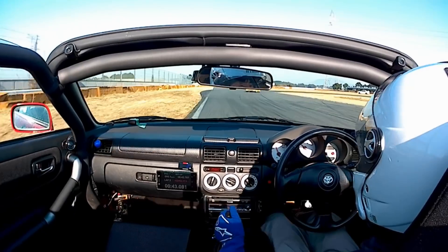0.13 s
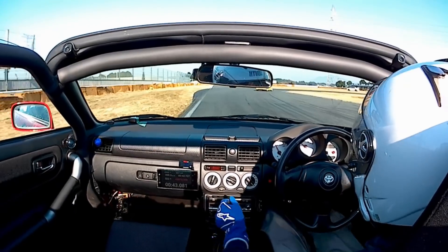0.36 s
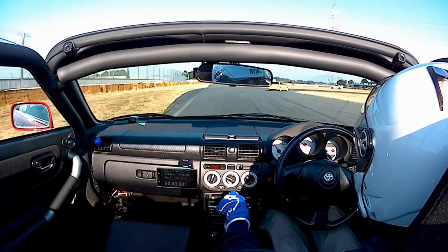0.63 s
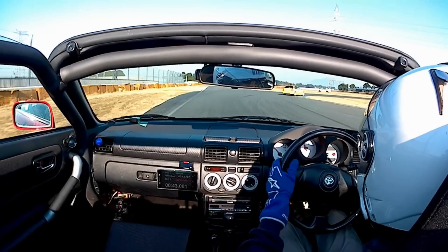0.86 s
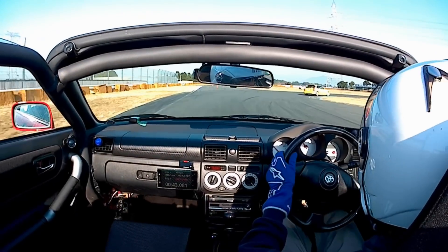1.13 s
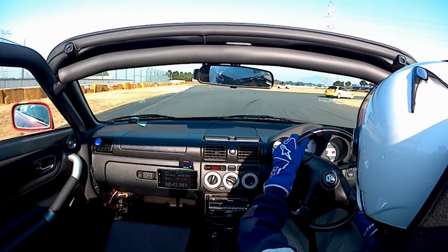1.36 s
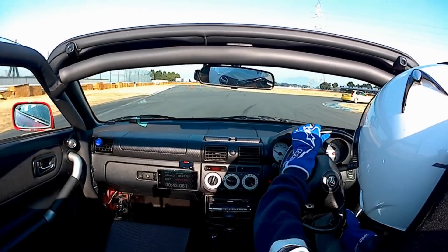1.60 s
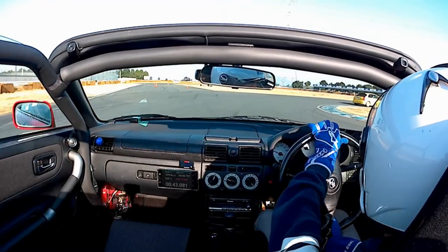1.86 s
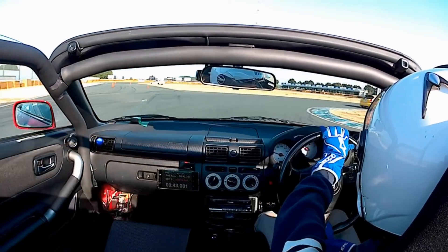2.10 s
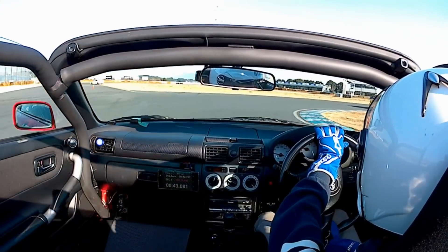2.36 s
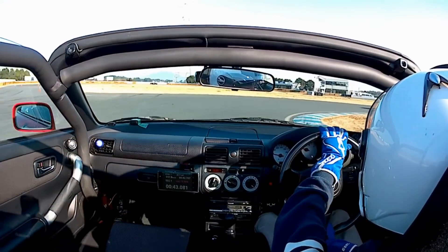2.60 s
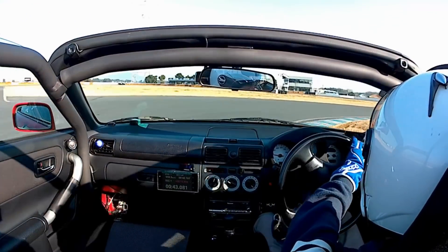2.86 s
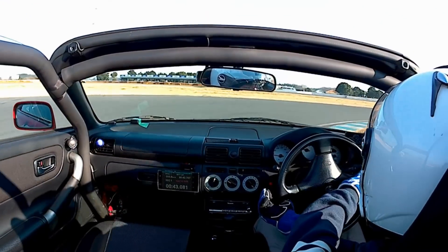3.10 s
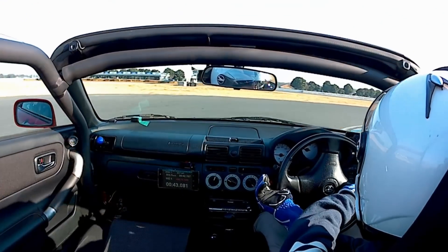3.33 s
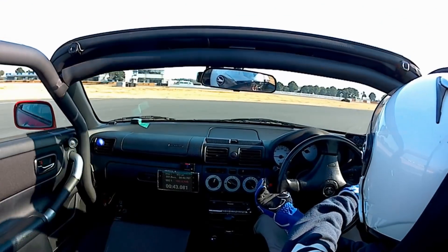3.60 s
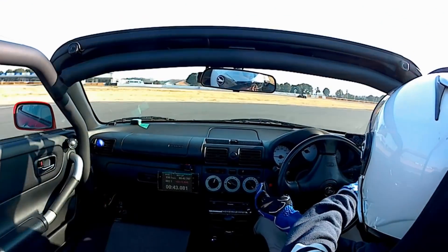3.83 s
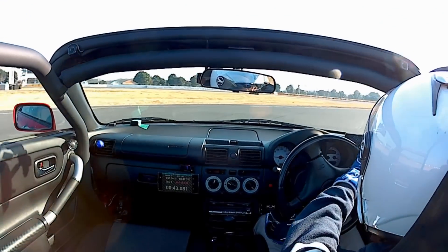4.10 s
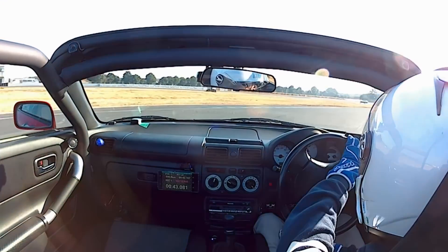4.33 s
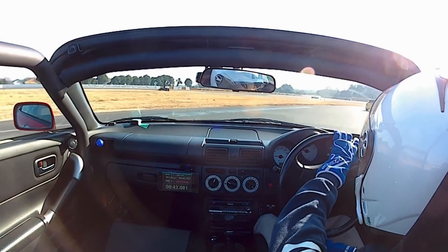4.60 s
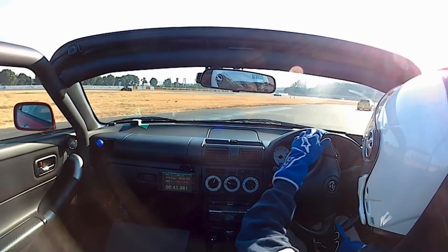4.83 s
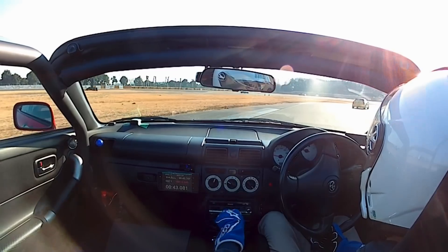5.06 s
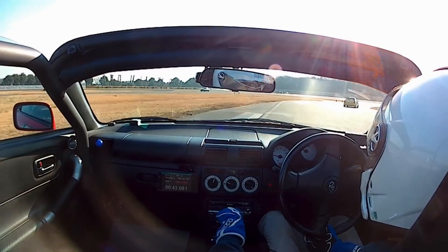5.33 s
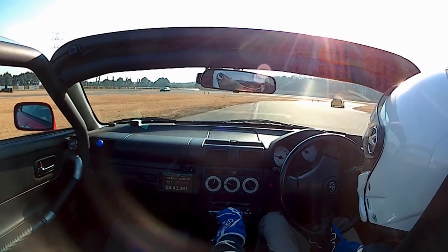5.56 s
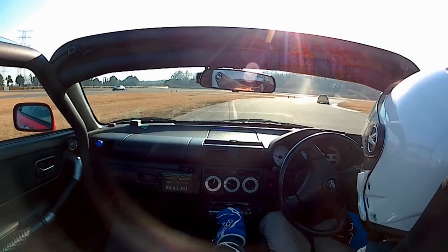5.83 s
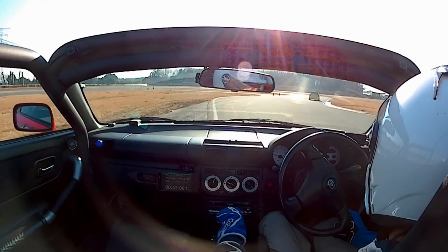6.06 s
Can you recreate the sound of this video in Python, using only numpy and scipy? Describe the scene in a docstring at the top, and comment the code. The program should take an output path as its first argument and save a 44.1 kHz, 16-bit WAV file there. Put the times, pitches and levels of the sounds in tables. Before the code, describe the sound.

In an open car on a race track, heavy low wind buffeting and road roar run throughout. Gear clunks and trim knocks surround a quick engine blip; the low drone then sinks through a bend and slowly climbs. Faint exhaust notes of two cars ahead appear, the first falling then rising. The microphone rides in the cockpit inside a closed case, so everything is boomy and muffled with grainy, resonant hiss.

```python
"""An engine blips for a downshift, slows into a bend and pulls away, in wind and road roar, with rattling trim.
Of two cars ahead, one slows then accelerates, the other accelerates, with faint exhaust notes. It is heard
in an open car, through a closed camera case. Engine and exhausts are wavering sines on multiples of a firing
rate; wind, roar, rush, growl and clunks are shaped noise; knocks and rattles ring the trim and the case.
An input stage rounds off large swings; the faint treble flickers, as bins drop out at random from frame to frame."""
import sys
import numpy as np
from scipy import signal
from scipy.io import wavfile
from scipy.ndimage import uniform_filter1d

SR = 44100
rng = np.random.default_rng(int(sys.argv[2]) if len(sys.argv) > 2 else 0)


def to_wav(s):
    """Save 16-bit WAV."""
    ch = np.atleast_2d(s).T  # columns
    pcm = np.round(np.clip(ch, -1, 1) * 32767)  # PCM
    wavfile.write(sys.argv[1], SR, pcm.astype(np.int16))


def invert_db(x):
    """Field ratio 10**(x/20) for x, a level in decibels (scalar or array-like)."""
    u = np.asarray(x, float) / 20
    return 10 ** u


N = 272979  # samples

# exhaust of the first car ahead: t/s, firing rate f/Hz, level/dB ahead of the order levels and far colour
FIRST_CAR_CURVE = [(1.4, 207, -64), (1.6, 197, -47.5), (1.9, 176, -52.5), (2.2, 149.2, -48.5),
                   (3.1, 167.1, -47.5), (3.45, 175.9, -42.5), (3.8, 185.1, -39), (4.3, 196.9, -38),
                   (4.85, 215.8, -40.5), (5.15, 226, -52), (5.75, 241.7, -52.5)]
# air resonances of the case: f/Hz, width/Hz, level/dB over a flat line
CASE_MODES = [(560, 21, -2.5), (1457, 190, 8), (1395, 500, 0), (3125, 632, 16.5), (4808, 460, 15),
              (6030, 130, 13.5), (6543, 483, 30), (9494, 570, 31), (15800, 230, 21)]
# air flow, mean levels: t/s, buffeting/dB, roar/dB, rush/dB, treble tilt of the rush/dB (full from 3 kHz up)
FLOW_CURVE = [(0.0, -17, -22.5, -35.5, -3), (0.33, -15.5, -32, -41, -4), (0.62, -17, -25.5, -37, 2),
              (0.8, -18.5, -30.5, -40, -1.5), (1.2, -21, -28, -39.5, 1.5), (2.0, -19, -32, -42.5, 1.5),
              (2.9, -22, -33.5, -44, 2), (3.5, -20.5, -30.5, -41, 0), (4.8, -22, -29, -41.5, 0),
              (5.35, -19.5, -33, -38.5, 1.5), (5.6, -21, -27, -37.5, 0), (6.19, -16.5, -30, -39.5, -2)]
GUST_CORNER_HZ = 9


def evened(x):
    """Scales to rms 1."""
    return x / np.sqrt(np.mean(x ** 2) + 1e-20)


def read(points, hz):
    """Reads a spectrum on a log-frequency axis."""
    f, value = np.transpose(points)
    return np.interp(np.log(hz + 1), np.log(f + 1), value)


def columns(rows, t):
    """Every column of a curve table at the times t."""
    s, *rest = np.transpose(rows)
    return [np.interp(t, s, c) for c in rest]


def drift(corner_hz):
    """Random wander of rms 1: one-pole low-passed noise."""
    knots_per_s = 60
    knots = rng.standard_normal(int(N / SR * knots_per_s) + 2)
    pole = np.exp(-2 * np.pi * corner_hz / knots_per_s)
    smooth = signal.lfilter([1], [1, -pole], knots)
    return evened(np.interp(np.arange(N) * knots_per_s / SR, np.arange(len(knots)), smooth))


def noise(shape_db, size, patchy_db, flicker_db):
    """Noise of rms 1 from random short-time spectra, with drifting patches and a flicker shared by all bins."""
    hop = size // 4
    frames, hz = N // hop + 5, np.fft.rfftfreq(size, 1 / SR)
    frame_s = np.arange(frames) * hop / SR
    a, b, patches = rng.standard_normal((frames, len(hz), 3)).T
    patches = uniform_filter1d(patches, size=6, axis=0)
    patches = evened(uniform_filter1d(patches, size=8, axis=1))
    flicker = evened(uniform_filter1d(rng.standard_normal(frames), size=3))
    level_db = shape_db(hz[:, None], frame_s) + patchy_db * patches + flicker_db * flicker
    z = (a + 1j * b) * invert_db(level_db)
    return evened(signal.istft(z, nperseg=size, noverlap=size - hop)[1][:N])


def orders(hz, multiples, levels_db, waver_db, corner_hz):
    """Sines on multiples of a firing rate, each wavering in strength."""
    turns = np.cumsum(hz) / SR
    out = 0
    for k, db in zip(multiples, levels_db):
        strength = np.sqrt(2) * invert_db(db + waver_db * drift(corner_hz))
        out = out + strength * np.sin(2 * np.pi * (k * turns + rng.random()))
    return out


def humps_db(modes, hz):
    """Gain of a row of resonances over a flat line."""
    return 20 * np.log10(1 + sum(invert_db(db) / (1 + (2 * (hz - f) / w) ** 2) for f, w, db in modes))


def engine(t):
    """Firing boom; upper orders open with the throttle and swell where they cross a cabin resonance."""
    # own engine: t/s, firing rate f/Hz, boom level/dB, throttle gain of the upper orders/dB
    engine_curve = [(0.0, 129, -25, -16), (0.12, 127.9, -22.5, -9), (0.17, 127, -26.5, -2),
                    (0.25, 125, -37, -18), (0.43, 129, -38, -17), (0.52, 131.7, -16.5, -1.5),
                    (0.548, 131.3, -26, -15), (0.57, 134, -26.5, -3.5), (0.654, 172, -27.5, -15),
                    (0.718, 177.3, -21.5, -4), (0.774, 161, -29.5, -15), (0.852, 135.2, -20, -9.5),
                    (1.0, 138, -21.5, -11.5), (1.284, 128.1, -19, -14.5), (1.45, 122, -32, -8),
                    (1.7, 112.4, -30, -16.5), (2.17, 101.5, -32.5, -14), (2.55, 98.02, -35.5, -8),
                    (3.0, 94, -28, -8.5), (3.35, 94.5, -34, -11), (3.55, 93.5, -28, -2.5),
                    (4.21, 97.3, -21.5, -0.5), (4.6, 99.6, -21.5, -4.5), (5.06, 105.6, -22, 0),
                    (5.45, 110.8, -30, -7.5), (6.19, 120.2, -26.5, 2.5)]
    # upper orders: multiple of the firing rate, level/dB ahead of throttle and cabin
    upper_orders = [(2, -42), (3, -49), (3.5, -51), (4, -57), (5, -59)]
    # cabin resonances passed by the upper orders: f/Hz, width/Hz, level/dB over a flat line
    cabin_modes = [(270, 19, -2), (394, 25, 3.5), (568.5, 49, 15)]
    hz, boom_db, throttle_db = columns(engine_curve, t)
    # below -23.5 dB the boom wavers more, the fainter it is
    waver_db = 0.39 + 0.21 * np.clip(-23.5 - boom_db, 0, 12)
    boom = orders(hz, [1], [boom_db], waver_db, corner_hz=11)
    multiples = [k for k, _ in upper_orders]
    upper_db = [db + throttle_db + humps_db(cabin_modes, k * hz) for k, db in upper_orders]
    return boom + orders(hz, multiples, upper_db, waver_db=4, corner_hz=11)


def jolt_db(t):
    """Jolts through the body change the noise level within a few milliseconds, then die away."""
    # jolts that shake the case: t/s, change of the rush/dB (one is a dip), decay/s
    jolts = [(0.053, 3, 0.023), (0.457, 3, 0.012), (0.514, 1, 0.033), (.575, -3.5, 0.043),
             (0.739, 2.5, 0.063), (1.501, 2, 0.012), (1.71, 1.5, 0.031), (5.01, 2.5, 0.025),
             (5.92, 2.5, .03), (6.075, 2.5, 0.031), (6.17, 4, 0.034)]
    rise_s = 0.0094  # ends at the listed time
    return sum(db * np.exp(-np.maximum(t - s, 0) / decay_s) * np.clip((t - s) / rise_s + 1, 0, 1)
               for s, db, decay_s in jolts)


def wind(t):
    """Lumpy pressure swings on the microphone, and the roar of road and body above them."""
    # buffeting spectrum: f/Hz, relative density/dB per Hz
    buffet_shape = [(2, -20), (7, -4), (15, 0), (24, -8), (38, -10), (58, -11), (75, -19), (110, -32),
                    (300, -130)]
    # roar spectrum: f/Hz, relative density/dB per Hz
    roar_shape = [(20, -61), (50, -23.5), (80, 2), (110, 4), (150, -4.5), (240, -3.5), (330, -12),
                  (480, -27.5), (700, -26), (2000, -120)]
    buffet = noise(lambda hz, s: read(buffet_shape, hz), size=8192, patchy_db=0.9, flicker_db=0)
    roar = noise(lambda hz, s: read(roar_shape, hz), size=1024, patchy_db=1.5, flicker_db=1.5)
    buffet_db, roar_db, *_ = columns(FLOW_CURVE, t)
    buffet_db = buffet_db + 2 * drift(GUST_CORNER_HZ)
    roar_db = roar_db + 1 * drift(GUST_CORNER_HZ) + 0.67 * jolt_db(t)
    return invert_db(buffet_db) * buffet + invert_db(roar_db) * roar


def case_db(hz):
    """Slope of the muffling case with its resonant humps."""
    # muffling slope: f/Hz, relative level/dB
    rush_slope = [(200, -19.5), (450, -4.5), (1000, -7.5), (2000, -15.5), (2500, -33.5), (4000, -41.5),
                  (5500, -44), (8000, -60), (16000, -52)]
    return read(rush_slope, hz) + humps_db(CASE_MODES, hz)


def ring(bright_db):
    """One tap rings the trim and the upper case resonances; each mode swells, then decays by its width."""
    trim_hz, trim_width_hz, trim_db = 1615, 390, 6.5  # level over the colour of the case
    t = np.arange(1300) / SR
    modes = [(f, w, bright_db if 2500 < f < 5500 else 0) for f, w, _ in CASE_MODES[1:]]
    modes.append((trim_hz, trim_width_hz, trim_db))
    out = 0
    for f, w, db in modes:
        envelope = w * t * np.exp(-np.pi * 0.9 * w * t)
        out = out + invert_db(case_db(f) + db) * envelope * np.sin(2 * np.pi * f * t)
    return out


def rush(t):
    """Air noise heard through the case, grainy with tiny rattles at random instants."""
    def bright(hz, s):
        tilt_db = columns(FLOW_CURVE, s)[-1] + 0.65 * jolt_db(s)
        return case_db(hz) + tilt_db * np.clip(hz / 1000 - 2, 0, 1)

    hiss = noise(bright, size=512, patchy_db=1.5, flicker_db=0.0)
    ticks_per_s = 300
    strength = invert_db(5.1 * np.minimum(rng.exponential(1, N), 4))
    ticks = strength * (rng.random(N) < ticks_per_s / SR) * rng.choice([-1, 1], N)
    rattle = evened(signal.oaconvolve(ticks, ring(0))[:N])
    return invert_db(columns(FLOW_CURVE, t)[-2] + jolt_db(t)) * (hiss + invert_db(-9) * rattle)


def knocks():
    """Knocks of loose trim: short bursts of impacts that swell, thin out and ring the trim and case."""
    # knocks: t/s, peak level/dB, gain of the 2.5-5.5 kHz modes/dB
    knock_rows = [(0.056, -23.5, 16), (0.5188, -23.5, 5), (0.5867, -31, 5), (0.7741, -27, 6),
                  (1.385, -26.5, 3), (1.5065, -31.5, 1), (1.7204, -35, 13), (3.442, -27.5, -3),
                  (5.8731, -17, -11), (5.8867, -25, -7), (6.0806, -27, 19)]
    swell_s = 0.0012
    out, age = np.zeros(N + 4000), np.arange(400) / (swell_s * SR)
    for s, db, bright_db in knock_rows:
        impacts = rng.standard_normal(400) * age * np.exp(-age)
        tap = np.convolve(impacts, ring(bright_db))
        out[round(s * SR):][:len(tap)] += invert_db(db) * tap / abs(tap).max()
    return out[:N]


def clunks(t):
    """Gear lever and driveline through the body: dull broad thuds that rise fast and decay exponentially."""
    # clunks: t/s, level at full swell/dB
    clunk_rows = [(0.052, -28), (0.456, -40), (0.517, -22), (0.575, -23.5)]
    # thud spectrum: f/Hz, relative density/dB per Hz
    clunk_shape = [(60, -31), (150, 5), (400, -11), (800, -18), (2000, -17), (3200, -46.5), (6000, -77)]
    rise_s, decay_s = 0.0052, 0.022
    thud = noise(lambda hz, s: read(clunk_shape, hz), size=512, patchy_db=0.5, flicker_db=1)
    envelope = sum(invert_db(db) * np.clip((t - s) / rise_s, 0, 1) * np.exp(-np.maximum(t - s, 0) / decay_s)
                   for s, db in clunk_rows)
    return thud * envelope


def car_ahead(rows, order_rows, t):
    """A far exhaust note: sines on a slightly unsteady firing rate, faded in and out."""
    # how far notes reach the cockpit: f/Hz, gain/dB
    far_colour = [(150, 9), (190, 7), (215, -8.5), (250, -2), (330, 2), (400, -9.5), (490, -8.5), (540, 1),
                  (660, 0.5), (740, -2.5), (800, -15), (1000, -11.5)]
    hz, level_db = columns(rows, t)
    start_s, end_s = rows[0][0], rows[-1][0] + 0.031
    fade = np.clip(np.minimum(t - start_s, end_s - t) / 0.1, 0, 1)
    multiples = [k for k, _ in order_rows]
    levels_db = [level_db + db + read(far_colour, k * hz) for k, db in order_rows]
    unsteady_hz = hz * (1 + 0.005 * drift(12))
    return fade * orders(unsteady_hz, multiples, levels_db, waver_db=3, corner_hz=10)


def growl(t):
    """Rough roar of the first car: noise that follows the level of its note."""
    # noisy part of the exhaust: f/Hz, relative density/dB per Hz
    growl_shape = [(400, -39.5), (580, -2), (760, 0.5), (920, -7), (1300, -39.5)]
    rough = noise(lambda hz, s: read(growl_shape, hz), size=1024, patchy_db=2.5, flicker_db=0.0)
    return invert_db(columns(FIRST_CAR_CURVE, t)[1] - 7.5) * rough


def scene():
    """Everything that reaches the microphone."""
    # second car ahead: t/s, firing rate f/Hz, level/dB ahead of the order levels and far colour
    second_car = [(4.95, 228, -30.5), (5.6, 250.1, -31.5), (6.19, 270.1, -34.5)]
    # exhaust orders of each car: multiple of the firing rate, level/dB
    first_orders = [(1, -2), (2, -11.5), (3, -6), (4, -9.5)]
    second_orders = [(0.99, 0), (5 / 4, -12)]
    t = np.arange(N) / SR
    own_car = engine(t) + wind(t) + rush(t) + knocks() + clunks(t)
    notes = car_ahead(FIRST_CAR_CURVE, first_orders, t) + car_ahead(second_car, second_orders, t)
    return (own_car + notes + growl(t))[None]


def drop_faint_bins(x):
    """Zeroes spectral bins under a threshold that varies at random per frame: the faint treble flickers."""
    # drop threshold: f/Hz, bin power/dB, ahead of the random variation
    floor_curve = [(2100, -110), (2400, -83.5), (3500, -83.5), (7000, -83), (9500, -81.5), (15000, -86.5)]
    jump_db = 7
    window = np.sin(np.pi * (np.arange(2048) + 0.5) / 2048)
    longer = np.pad(x, [(0, 0), (0, 4096)], "reflect")
    hz, s, z = signal.stft(longer, SR, window, nperseg=2048, noverlap=1024, boundary="even")
    near_db = 10 * np.log10(uniform_filter1d(abs(z) ** 2, size=3, axis=1) + 1e-20)
    threshold_db = read(floor_curve, hz)[:, None] + jump_db * (1 - rng.exponential(1, len(s)))
    kept = near_db > threshold_db
    return signal.istft(z * kept, SR, window, nperseg=2048, noverlap=1024)[1][:, :N]


def top_cut(x):
    """Nothing passes above the cut-off."""
    return signal.sosfilt(signal.butter(12, 14900, fs=SR, output="sos"), x)


def record(dry):
    """The input stage rounds off large swings and adds a small offset; faint bins drop out; the ends fade."""
    rounded = 1.1 * np.tanh(dry / 1.1) + 0.006
    fade_s = 0.004
    to_end_s = np.minimum(np.arange(N), np.arange(N)[::-1]) / SR
    fade = np.sin(np.pi / 2 * np.minimum(to_end_s / fade_s, 1)) ** 2
    return top_cut(drop_faint_bins(rounded) * fade)


dry = scene()
out = record(dry)
to_wav(out)
```